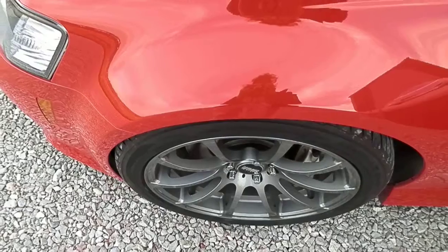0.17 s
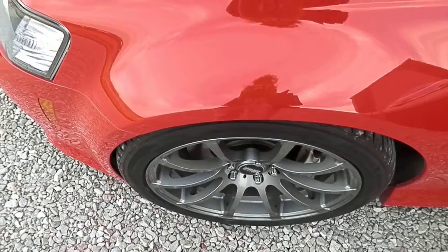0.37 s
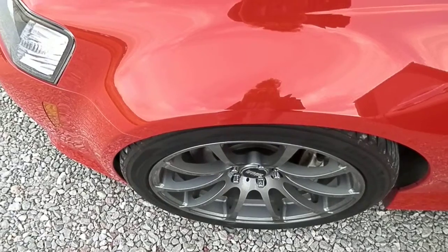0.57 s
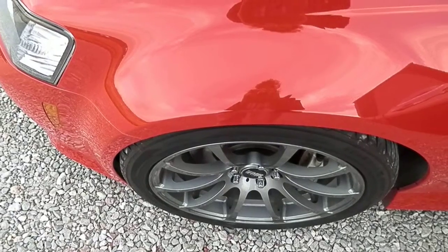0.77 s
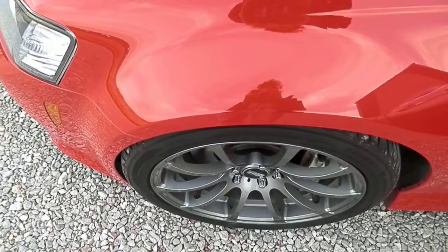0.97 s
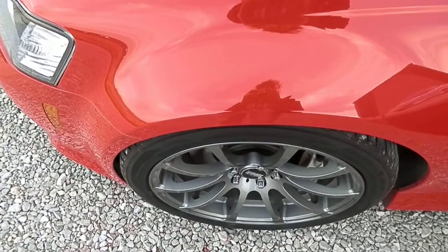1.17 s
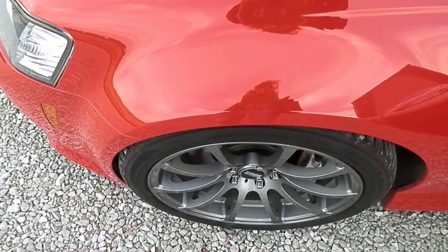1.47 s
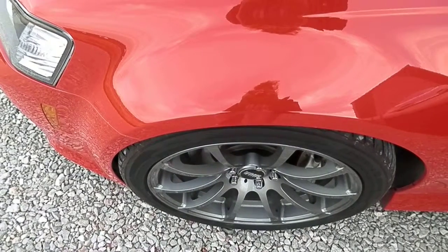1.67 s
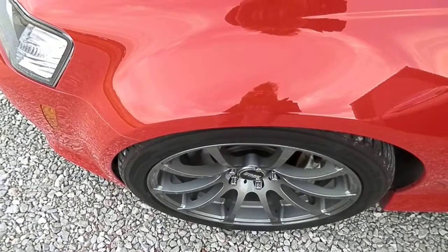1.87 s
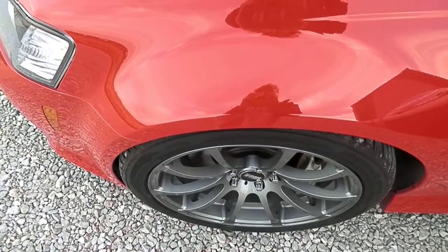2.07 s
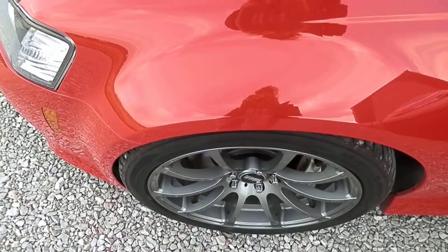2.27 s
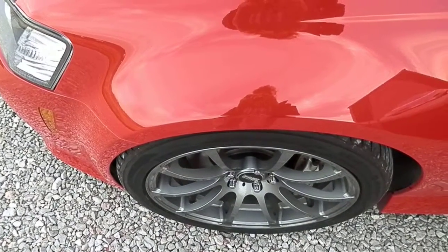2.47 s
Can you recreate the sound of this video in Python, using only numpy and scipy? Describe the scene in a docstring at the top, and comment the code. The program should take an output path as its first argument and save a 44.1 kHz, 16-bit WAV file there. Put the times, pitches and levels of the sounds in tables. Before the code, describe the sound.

After a tiny silence, a parked car's deep idle rumbles and lopes without revving. Quiet hissy ticks and a thin mechanical whine sit beneath, while low thuds hit the handheld microphone, mostly in the first half.

```python
"""After a tenth of a second of silence an eight-cylinder car engine is heard idling, close beside the front wheel.
Uneven firings ring exhaust resonances over a silencer boom and throbs; the engine bay adds coloured hiss,
tiny impacts in metal and wavering tones. Three gritty bursts of noise tick in each cycle.
Soft bumps on the microphone are low pushes that ring out. The whole level dips at listed moments and climbs back."""
import sys
import numpy as np
from scipy import signal
from scipy.fft import rfft, irfft
from scipy.io import wavfile
from scipy.ndimage import uniform_filter1d

SR = 44100
rng = np.random.default_rng(int(sys.argv[2]) if len(sys.argv) > 2 else 0)


def to_wav(sig):
    """Store sig (one row per channel, or 1-D mono) as 16-bit WAV at the path in sys.argv[1].

    Samples outside -1..1 are clipped; the rate is SR.
    """
    pcm = np.clip(np.atleast_2d(sig), -1, 1) * 32767
    pcm = np.round(pcm).astype(np.int16)
    wavfile.write(sys.argv[1], SR, pcm.T)  # frames by channels


N = 115542

START_S = 0.1
CYCLE_HZ = 6.266  # engine cycles, of eight firings each


def undb(db):
    """Turn dB into gain."""
    return 10 ** (np.asarray(db) / 20)


def level(x, db):
    """Set the rms level in dB."""
    return x * undb(db) / np.sqrt(np.mean(x ** 2))


def ring(x, hz, width_hz):
    """Pass x twice through one resonance, for steep skirts; the width is that of a single pass."""
    b, a = signal.iirpeak(hz, hz / width_hz, fs=SR)
    once = signal.lfilter(b, a, x)
    return signal.lfilter(b, a, once)


def colour(x, points):
    """Shape the spectrum of a noise by (Hz, dB) points, joined along log frequency."""
    hz, db = np.array(points).T
    f = np.maximum(np.arange(N // 2 + 1) * SR / N, 1)
    gain = undb(np.interp(np.log(f), np.log(hz), db))
    return irfft(rfft(x) * gain, N)


def walk(rate):
    """Slow random wander with a spread near 1: random steps, rate a second, smoothed twice."""
    k = int(SR / rate)
    steps = np.repeat(rng.standard_normal(N // k + 1), k)
    smooth = uniform_filter1d(uniform_filter1d(steps, k), k)
    return 1.83 * smooth[:N]


def bands(x, flicker_db, rate):
    """Split x into overlapping octave bands, each flickering alone."""
    spectrum = rfft(x)
    hz = np.arange(len(spectrum)) * SR / N
    octave = np.log2(np.maximum(hz, 31.25) / 31.25)
    out = np.zeros(N)
    for k in range(10):
        band = irfft(spectrum * np.clip(1 - abs(octave - k), 0, 1), N)
        out += undb(flicker_db * walk(rate)) * band
    return out


def grains():
    """Dense tiny impacts of random sign and uneven size, swelling and thinning in strength."""
    grains_per_s, spread_db, swell_db = 1400, 4.0, 1.5
    hits = rng.random(N) < grains_per_s / SR
    sign = rng.choice([-1., 1.], N)
    size = np.minimum(rng.exponential(size=N), 2)
    return hits * sign * undb(spread_db * size + swell_db * walk(20))


def engine_bay(t):
    """Broad flickering whir, small impacts exciting metal resonances, and wavering accessory tones."""
    # Spectrum of the whir. Each row: frequency in Hz, relative density in dB per Hz.
    whir_colour = [(15, -45), (25, -12.5), (96, -5.5), (116, -11.5), (144, -55), (179, -9.5), (222, -20),
                   (290, -18.5), (360, -22), (670, -21.5), (831, -30), (1210, -32), (2950, -32.5),
                   (4660, -42), (6990, -35.5), (11000, -62), (15700, -66)]
    # Metal resonances in the whir. Each row: frequency in Hz, width in Hz, rms level in dB.
    clatter = [(637, 200, -41.5), (1927, 76, -45.5), (2049, 20, -52), (2141, 39, -45.5), (2352, 57, -48),
               (2661, 120, -43), (2978, 290, -39.5), (3382, 230, -48.5), (3847, 220, -47.5),
               (4160, 190, -47.5), (6880, 300, -52)]
    # Tones of an accessory. Each row: frequency in Hz, rms level in dB.
    whine = [(265.1, -34.5), (525.5, -43.5), (386, -49.5), (566, -48)]
    whir_db, flicker_db = -23.5, 0.4

    whir = bands(colour(rng.standard_normal(N), whir_colour), flicker_db, 14.)
    out = level(whir, whir_db)
    for hz, width_hz, db in clatter:
        out = out + level(ring(grains(), hz, width_hz), db)
    for hz, db in whine:
        strength = undb(1.37 * walk(5.63))
        phase_wander = 0.27 * walk(3.87)  # radians
        tone = strength * np.sin(2 * np.pi * hz * t + phase_wander)
        out = out + level(tone, db)
    return out


def bumps(t):
    """Each bump on the microphone is a quick low push with a pointed tip, ringing out exponentially."""
    # Each row: time in seconds, level of the ring in dB, pitch in Hz, decay to 1/e in cycles, sign.
    knocks = [(.234, -9.5, 149, 1.7, 1), (.596, -15, 228, 0.73, 1), (0.605, -11.5, 185, .8, 1),
              (0.6269, -4, 194, 0.85, 1), (0.6372, 2.5, 154, 1.5, 1), (0.708, -10, 240, 0.89, 1),
              (0.734, -1.5, 174, 0.87, -1), (0.746, -8, 175, 0.75, -1), (1.054, -14.5, 196, 1.1, 1),
              (1.067, -8.5, 174, 1.3, 1), (1.087, -14, 210, 1.4, 1), (1.098, -5.5, 151, 1.5, 1),
              (1.127, -9.5, 142, 0.81, 1), (1.138, -11.5, 170, 0.74, -1), (1.341, -4, 218, 1.3, -1),
              (1.3749, 0, 169, 0.93, -1), (1.888, -14.5, 171, 1.1, 1), (2.18, -6, 166, 0.65, 1),
              (2.41, -19, 168, 1.1, 1)]
    rise_turns = 0.22
    tip_db, tip_s = -5, 0.0004  # tip relative to the ring, and its decay each way

    out = 0
    for s, db, hz, cycles, sign in knocks:
        turns = hz * (t - s)
        rise = np.exp(-(turns / rise_turns) ** 2)
        fall = np.exp(-abs(turns) / cycles)
        shape = np.where(turns < 0, rise, fall)
        tip = undb(tip_db) * np.exp(-abs(t - s) / tip_s)
        out = out + np.sign(sign) * undb(db) * (np.cos(2 * np.pi * turns) * shape + tip)
    return out


def ticks(t):
    """Valve gear: bursts of gritty hiss at three fixed places in each cycle, under one patchy colour."""
    # The three ticks. Each row: place in the cycle from 0 to 1, attack, hold and decay in seconds.
    tick_shapes = [(0.043, .004, 0.02, 0.018), (0.415, 0.007, .006, 0.016), (0.705, 0.019, 0.01, 0.011)]
    # One row a cycle: relative strength of the first, second and third tick in dB.
    strengths = [(-42, -38, -30.5), (-27, -30, -33), (-30.5, -37, -32), (-29.5, -37, -32.5),
                 (-31, -34, -32.5), (-29.5, -32.2, -34), (-30.5, -32, -30), (-30, -28, -34),
                 (-28, -48, -33.5), (-29.5, -29.5, -32.5), (-31.5, -30, -32.5), (-36.5, -32, -32),
                 (-30.5, -38, -30), (-27, -28.5, -37), (-35, -34.5, -32.8), (-28, -30, -36),
                 (-29, -40.0, -40.0)]
    # Spectrum of the hiss. Each row: frequency in Hz, relative density in dB per Hz.
    hiss_colour = [(1000, -7.5), (2000, -2.5), (3000, -1), (5000, -6.5), (6000, -5.5), (7200, 1),
                   (8300, -7), (9500, -15.5), (11000, -20.5), (15800, -24)]
    tick_db, grit_db, patchy_db = -34.5, 1, 1.5
    top_from_hz, top_evenness = 9500, 0.66  # a power below 1 makes the ticks differ less up there

    envelope = np.zeros(N)
    for cycle, row in enumerate(strengths):
        for (place, attack_s, hold_s, decay_s), db in zip(tick_shapes, row):
            age = np.maximum(t - (cycle + place) / CYCLE_HZ, 0)
            rise = np.clip(age / attack_s, 0, 1)
            fall = np.exp(-np.maximum(age - attack_s - hold_s, 0) / decay_s)
            envelope += undb(db) * rise * fall
    envelope = level(envelope, 0)

    hiss = bands(colour(rng.standard_normal(N), hiss_colour), patchy_db, 39.8)
    high_pass = signal.butter(4, top_from_hz, "high", fs=SR, output="sos")
    top = signal.sosfiltfilt(high_pass, hiss)
    bursts = envelope * (hiss - top) + envelope ** top_evenness * top
    grit = undb(grit_db * walk(500))
    return level(grit * bursts, tick_db)


def exhaust(t):
    """Uneven firings and turbulent gas ring the pipes; the silencer throbs with a falling pitch."""
    # Pipe resonances. Each row: frequency in Hz, width in Hz, rms level in dB.
    pipes = [(48.2, 16, -22.5), (74.7, 6.8, -33), (99.37, 27, -20.5), (173.3, 27, -29), (307.2, 25.7, -33)]
    # Silencer throbs of the loping idle. Each row: centre in seconds, peak in dB, pitch at the centre in Hz,
    # length in seconds.
    throbs = [(0.132, -12, 88.4, 0.064), (0.246, -9.5, 83.8, 0.11), (0.344, -5.5, 92, 0.032),
              (0.395, -18, 87, 0.026), (0.438, -12, 93, 0.04), (0.546, -5, 80, 0.036),
              (0.6, -11.5, 96, 0.09), (0.679, -12, 90.7, 0.024), (0.715, -9, 87, 0.034),
              (0.761, -10, 91, 0.025), (0.873, -9, 85.8, 0.089), (0.993, -7, 91.5, 0.026),
              (1.088, -10.5, 85.8, 0.064), (1.137, -7.5, 98, 0.025), (1.207, -7.0, 79.5, 0.056),
              (1.275, -13, 94, 0.03), (1.325, -5.5, 90, 0.033), (1.391, -6.5, 89.4, 0.054),
              (1.455, -7, 88.5, 0.014), (1.531, -8, 81, 0.084), (1.622, -7, 94.8, 0.04),
              (1.698, -11.8, 93, 0.031), (1.761, -20, 86, 0.034), (1.818, -8.5, 80.7, 0.058),
              (1.885, -8.3, 95, 0.041), (1.949, -11, 85.3, 0.072), (2.043, -11.5, 93, 0.088),
              (2.167, -9, 83.6, 0.077), (2.266, -9, 89, 0.034), (2.362, -10, 90.0, 0.061),
              (2.479, -7, 80.3, 0.084), (2.574, -16, 94.3, 0.075)]
    first_firing_s, scatter_db = 0.0041, 4.0
    jitter = 0.037  # share of the gap between firings
    glide = -0.046  # share of the pitch gained over one length
    boom_hz, boom_width_hz, boom_db = 85.2, 45, -26.5  # turbulent gas in the silencer

    firing_hz = 8 * CYCLE_HZ
    k = np.arange(int(N / SR * firing_hz))
    timing, strength = rng.standard_normal((len(k), 2)).T
    at = (first_firing_s + (k + jitter * timing) / firing_hz) * SR
    pulses = np.zeros(N)
    pulses[np.clip(at.astype(int), 0, N - 1)] = undb(scatter_db * strength)

    out = np.zeros(N)
    for i, (hz, width_hz, db) in enumerate(pipes):
        out += (-1) ** i * level(ring(pulses, hz, width_hz), db)  # neighbours have opposite sign
    for (s, db, hz, length_s), turn in zip(throbs, rng.random(len(throbs))):
        u = np.clip((t - s) / length_s, -2, 2)
        swell = np.exp(-(1.84 * u) ** 4)
        turns = hz * (t - s) * (1 + glide * u / 2) + turn
        out += undb(db) * swell * np.sin(2 * np.pi * turns)
    boom = ring(rng.standard_normal(N), boom_hz, boom_width_hz)
    return out + level(boom, boom_db)


def dips(t):
    """Gain of the whole sound: a quick fall into each dip, then a steady climb in dB; the deepest rules."""
    # Each row: time of the lowest point in seconds, depth in dB.
    low_points = [(.25, -1), (.635, -8.5), (.745, -2), (1.10, -2), (1.335, -4), (1.378, -10), (2.132, -2.5),
                  (2.451, -1.5)]
    attack_s, recover_db_per_s = 0.007, 17.5
    curves = []
    for s, db in low_points:
        fall = np.clip((t - s) / attack_s + 1, 0, 1)
        climb = np.minimum(db + recover_db_per_s * np.maximum(t - s, 0), 0)
        curves.append(fall * climb)
    return undb(np.min(curves, axis=0))


def scene():
    """The engine and the bumps together, under the dips of level, after the opening silence."""
    t = np.arange(N) / SR
    together = engine_bay(t) + bumps(t) + ticks(t) + exhaust(t)
    return (together * dips(t) * (t > START_S))[None]


def record(dry):
    """Peaks are rounded towards a ceiling and the top is cut steeply."""
    ceiling, top_hz = 0.76, 15830
    rounded = dry / (1 + (abs(dry) / ceiling) ** 4) ** (1 / 4)
    low_pass = signal.ellip(12, .2, 80, top_hz, fs=SR, output="sos")
    return signal.sosfilt(low_pass, rounded)


dry = scene()
out = record(dry)
to_wav(out)
```